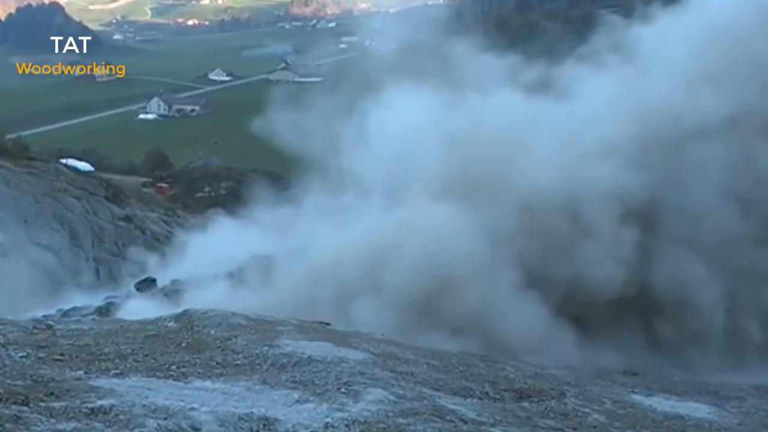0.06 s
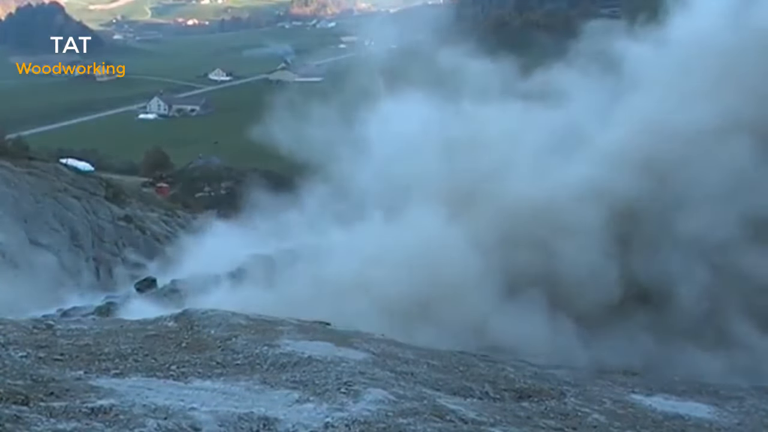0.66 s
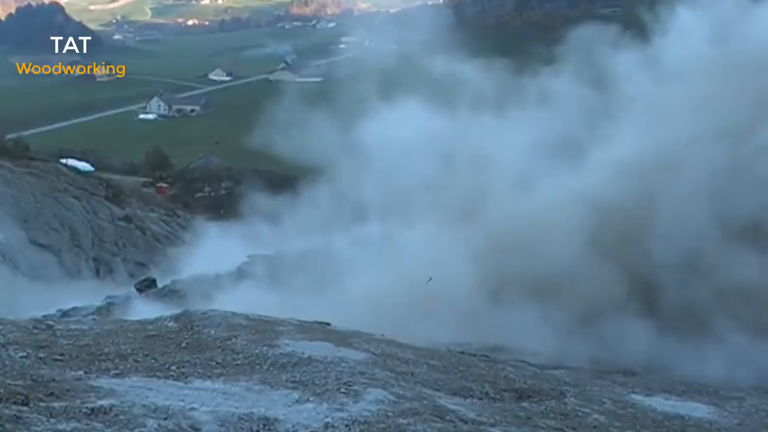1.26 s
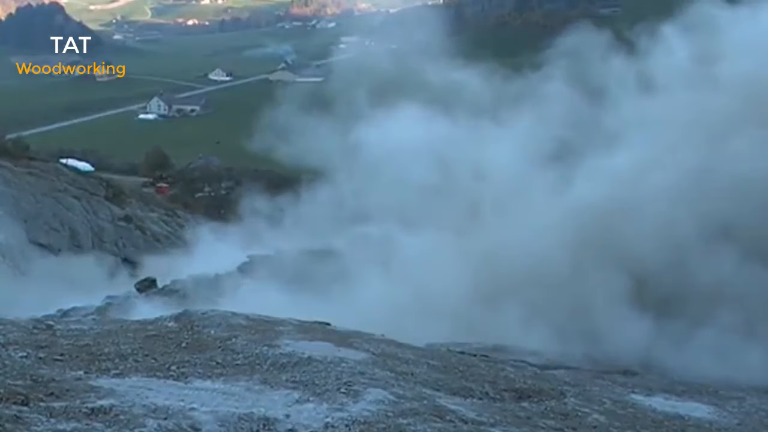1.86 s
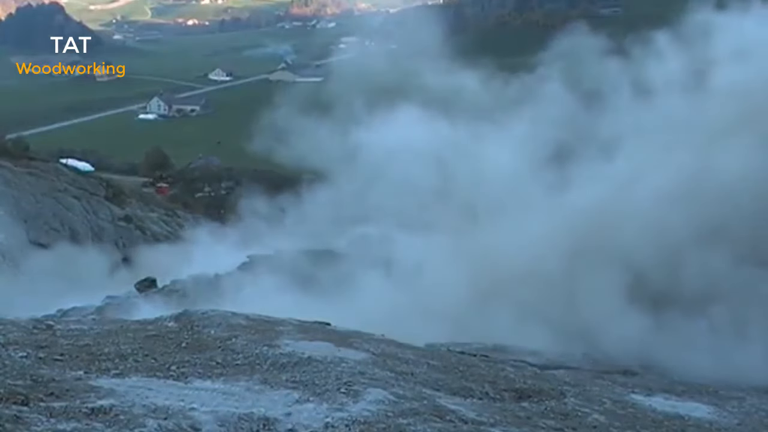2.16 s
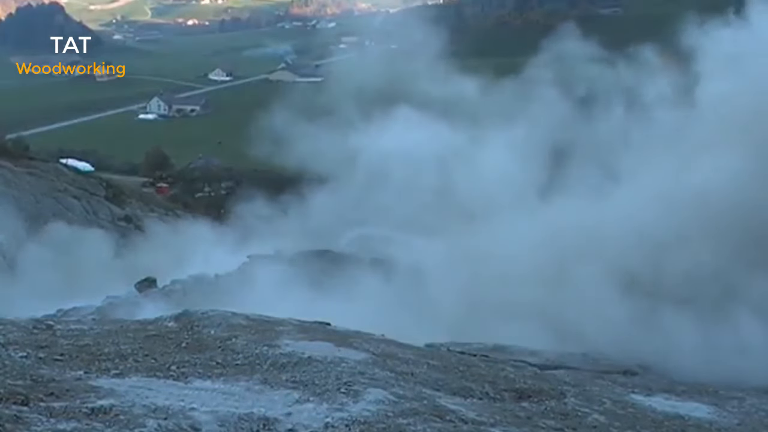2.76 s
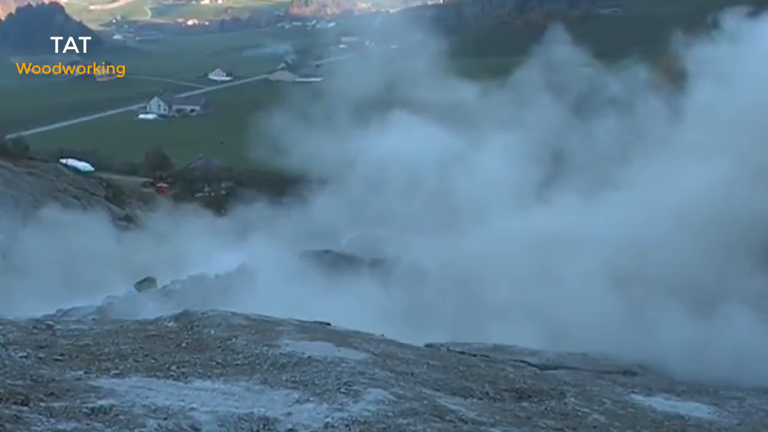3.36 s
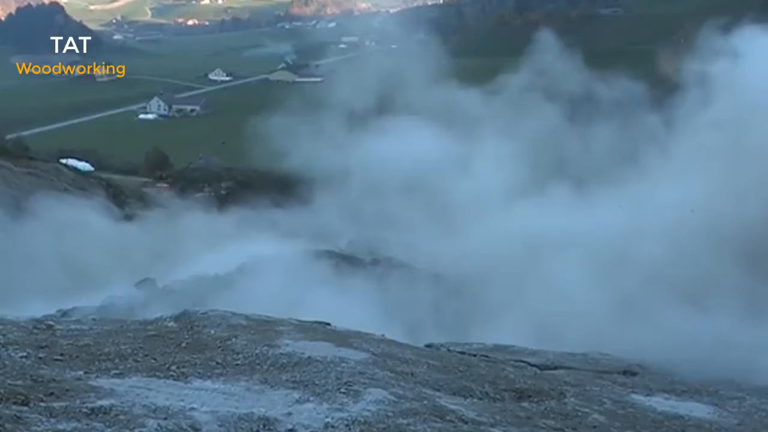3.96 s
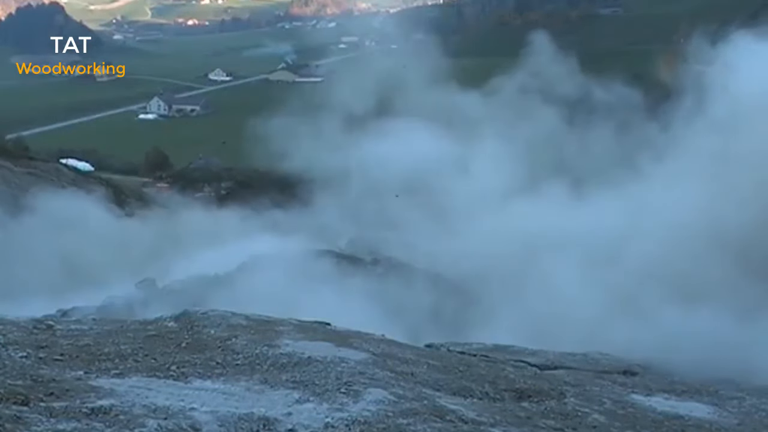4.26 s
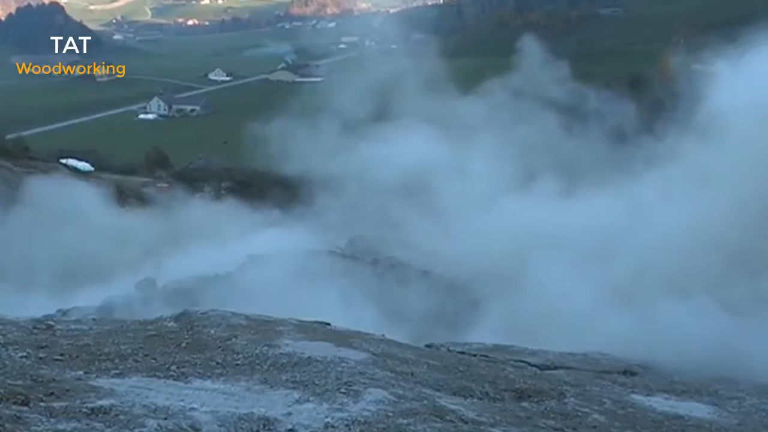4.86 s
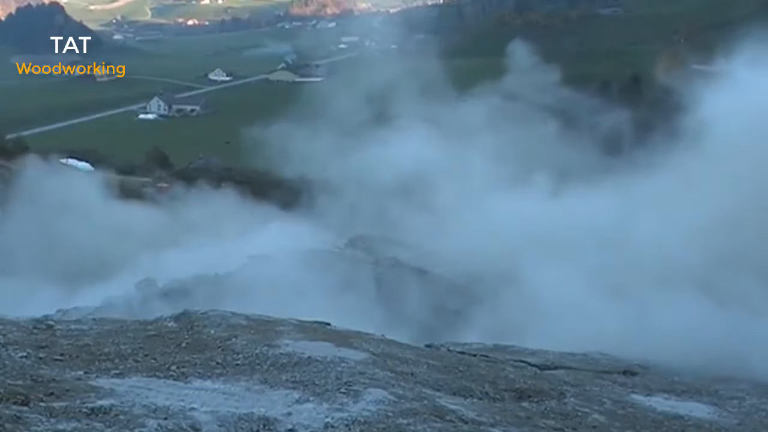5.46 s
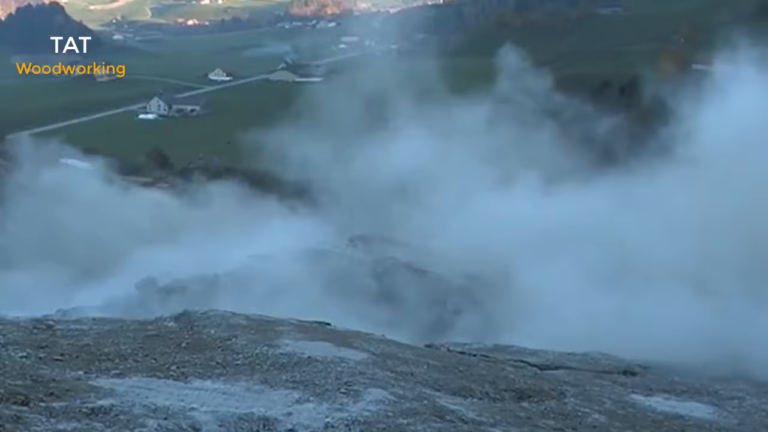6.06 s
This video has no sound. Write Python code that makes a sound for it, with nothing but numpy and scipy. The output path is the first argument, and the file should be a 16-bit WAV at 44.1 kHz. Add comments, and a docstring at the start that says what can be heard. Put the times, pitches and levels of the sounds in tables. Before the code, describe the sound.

Blasted rock pours down a quarry face, heard from the rim in open air. Countless small knocks merge into a broad, clattering rush, with a low ground rumble beneath it. Boulders land with dull thuds, most often in the first half, and now and then a brief spray of grit ticks closer by. The slide slowly weakens as the heap settles but is still running at the end.

```python
"""A broad, clattering rush of stones that slowly ebbs: blasted rock pours down a quarry face,
heard from the rim in open air. Countless knocks merge into the rush, fading as the heap settles.
Under it the sliding mass shakes the ground with a low rumble.
Now and then grit sprays closer by, and landing boulders thud."""
import sys
import numpy as np
from scipy import signal
from scipy.fft import rfft, irfft, next_fast_len
from scipy.io import wavfile
from scipy.ndimage import uniform_filter1d

SR = 44100
rng = np.random.default_rng(int(sys.argv[2]) if len(sys.argv) > 2 else 0)


def transcribe(signal):
    """Save signal, clipped to [-1, 1], as a 16-bit WAV file at the path in sys.argv[1]."""
    frames = np.atleast_2d(signal).T
    limited = np.clip(frames, -1, 1)
    pcm = np.round(limited * 32767).astype(np.int16)
    wavfile.write(sys.argv[1], SR, pcm)


N = 274291
HOP = 128
TIME_S = np.arange(N) / SR
FRAME_S = np.arange(N // HOP + 6) * HOP / SR
BIN_HZ = np.fft.rfftfreq(4 * HOP, 1 / SR)

# flow of the slide: (time [s], clatter level [dB], coarse rubble share [dB], fine grit share [dB])
FLOW = [(0.0, -26, -10.5, -8.5), (1.5, -26, -10.5, -8.5), (2.7, -27, -11, -8.5), (3.26, -28.5, -11.5, -7.5),
        (4.75, -30, -11.5, -8), (6.22, -31.6, -12.5, -6.5)]


def gain_of(db):
    return 10 ** (np.asarray(db) / 20)


def unit_rms(x):
    return x / np.sqrt(np.mean(x ** 2) + 1e-20)


def at_hz(rows, hz, column=1):
    """One table column, interpolated over log frequency."""
    table = np.transpose(rows)
    return np.interp(np.log(hz + 1), np.log(table[0] + 1), table[column])


def at_time(rows, time_s):
    """All value columns, interpolated over time."""
    knots_s, *columns = np.transpose(rows)
    return [np.interp(time_s, knots_s, column) for column in columns]


def bell(centre_s, sigma_s):
    """Gaussian envelope, height 1."""
    return np.exp(-.5 * ((TIME_S - centre_s) / sigma_s) ** 2)


def swells_db(rows):
    """Sum of bell-shaped level rises."""
    return sum(db * bell(centre_s, sigma_s) for centre_s, db, sigma_s in rows)


def coloured(x, spectrum):
    """x shaped by (frequency [Hz], level [dB]) rows, at rms 1."""
    size = next_fast_len(N)
    gain = gain_of(at_hz(spectrum, np.fft.rfftfreq(size, 1 / SR)))
    return unit_rms(irfft(rfft(x, size) * gain, size)[..., :N])


def spectra(x):
    """STFT as (channels, bins, frames)."""
    padded = np.pad(x, ((0, 0), (0, 8 * HOP)))
    return signal.stft(padded, nperseg=4 * HOP, noverlap=3 * HOP)[2][..., :len(FRAME_S)]


def stereo(fields):
    """Two independent STFTs to stereo at rms 1: alike in the bass, treble mostly leading on the left."""
    # two microphone ports: (frequency [Hz], coherence [0-1], left lead [rad], left over right [dB])
    ports = [(260, 1.0, -0.26, 0), (330, 0.99, -0.5, -0.8), (500, 0.87, 0.02, 0), (1400, 0.85, -0.07, 0.2),
             (2500, 0.69, 0.13, 0.2), (3300, 0.76, 0.36, 0.8), (4500, 0.67, 0.72, 1.7),
             (5500, 0.64, 0.88, 2.5), (6850, 0.6, 1.9, 2.5), (8200, 0.63, 1.04, 4),
             (9600, 0.62, 1.02, -0.5), (10800, 0.51, 2.5, 0.5), (12400, 0.4, 3, 0)]
    coherence, lead_rad, lean_db = (at_hz(ports, BIN_HZ, column)[:, None] for column in (1, 2, 3))
    right = (coherence * fields[0] + np.sqrt(1 - coherence ** 2) * fields[1]) * np.exp(-1j * lead_rad)
    pair = np.array([fields[0] * gain_of(lean_db / 2), right * gain_of(-lean_db / 2)])
    return unit_rms(signal.istft(pair, nperseg=4 * HOP, noverlap=3 * HOP)[1][:, :N])


def impacts(per_s, spread_db):
    """Two trains of random knocks, most small, a few large."""
    size = gain_of(spread_db * np.minimum(rng.exponential(1, (2, N)), 4))
    polarity = rng.choice([-1, 1], (2, N))
    hits = rng.random((2, N)) < per_s / SR
    return unit_rms(size * polarity * hits)


def patches(bins, frames):
    """Smoothed random time-frequency field, rms 1."""
    field = rng.standard_normal((len(BIN_HZ), len(FRAME_S)))
    return unit_rms(uniform_filter1d(uniform_filter1d(field, bins, axis=0), frames, axis=1))


def slide(level_db=2.0, near_db=-5, patchy_db=0.67, surge_db=0.27, rubble_hz=850, grit_hz=5200):
    """Far stones blur into a rush, nearer ones tick through it; rubble sounds low, grit high."""
    # rush of the stones: (frequency [Hz], level [dB])
    rush_spectrum = [(100, -20), (270, -9), (440, -4.2), (760, -4), (1250, -1.63), (2080, 0), (2450, -1.1),
                     (3150, 0.6), (4100, -.6), (5600, -6), (8100, -7), (9300, -12), (11000, -21.5),
                     (13500, -44.5)]
    # rings of tumbling blocks: (frequency [Hz], width [Hz], boost [dB])
    block_rings = [(640, 60, 1.5), (884, 60, 1.5), (1200, 55, 1), (1385, 45, 0.9), (1500, 70, 1.4),
                   (1675, 40, -1.5), (2850, 90, 1.0)]
    # stones thrown up by a heavy landing: (centre [s], swell [dB], sigma [s])
    bursts = [(.44, 2, 0.022)]
    far = rng.standard_normal((2, N))
    near = gain_of(near_db) * impacts(per_s=5000, spread_db=3.0)
    stones = unit_rms(far + near)
    flow_db, rubble_db, grit_db = at_time(FLOW, FRAME_S)
    hz = BIN_HZ[:, None]
    rings_db = sum(db / (1 + (2 * (hz - ring_hz) / width_hz) ** 2)
                   for ring_hz, width_hz, db in block_rings)
    bass_db = (rubble_db - rubble_db.mean()) / (1 + (hz / rubble_hz) ** 4)
    treble_db = (grit_db - grit_db.mean()) / (1 + (grit_hz / (hz + 1)) ** 6)
    # stones of like size fall in clumps
    clumps_db = patchy_db * patches(bins=9, frames=18) + surge_db * patches(bins=70, frames=14)
    colour_db = at_hz(rush_spectrum, hz) + rings_db + bass_db + treble_db + clumps_db
    rush = stereo(spectra(stones) * gain_of(colour_db))
    return rush * gain_of(level_db + np.interp(TIME_S, FRAME_S, flow_db) + swells_db(bursts))


def rumble(level_db=-42.0, ebb_ratio=1.1, deep_hz=50, deep_db=1.2, deep_ratio=1.6):
    """Moving mass shakes the ground: ebbs with the flow, swells at slumps, the deep band most. Mono."""
    # ground shake: (frequency [Hz], level [dB])
    ground_spectrum = [(8, -20), (19, -13), (30, -2.5), (48, -2.5), (62, 0.5), (76, -2), (110, -2.5),
                       (185, -4.5), (280, -11.5), (600, -37), (2000, -80)]
    # heavy parts of the heap giving way: (centre [s], swell [dB], sigma [s])
    slumps = [(.39, 4, .06), (.72, 1.5, .12), (1.5, 3.3, .25)]
    flow_db = at_time(FLOW, TIME_S)[0]
    mass_db = ebb_ratio * (flow_db - flow_db[0]) + swells_db(slumps)
    shake = coloured(rng.standard_normal(N), ground_spectrum)
    deep = signal.sosfiltfilt(signal.butter(2, deep_hz, fs=SR, output="sos"), shake, padtype="even")
    upper = gain_of(mass_db) * (shake - deep)
    return gain_of(level_db) * (upper + gain_of(deep_db + deep_ratio * mass_db) * deep)


def grit_sprays():
    """Brief showers of fine grit, close enough to keep their treble."""
    # showers: (centre [s], level [dB], sigma [s])
    showers = [(.33, -41, .008), (.417, -40, .005), (.871, -41, .006), (1.185, -42, .005),
               (1.416, -33, .004), (3.403, -34.5, .013), (4.853, -43, .005)]
    # grit ticks: (frequency [Hz], level [dB])
    grit_spectrum = [(300, -40), (2500, -8), (5500, -1), (9500, -1), (11500, -4), (14000, -17)]
    envelope = sum(gain_of(db) * bell(centre_s, sigma_s) for centre_s, db, sigma_s in showers)
    ticks = coloured(impacts(per_s=3500, spread_db=2.5), grit_spectrum)
    return envelope * stereo(spectra(ticks))


def boulders(level_db=-1, rise_s=.003, decay_cycles=1.6, crunch_gain=.3):
    """Each landing is a low push with a dull crunch; heavy, low boulders last longer."""
    # landings: (time [s], level [dB], pitch [Hz])
    landings = [(.366, -32, 42), (.406, -33, 58), (.431, -32, 170), (.446, -33, 130), (.645, -33, 45),
                (.73, -34, 65), (1.125, -34, 135), (1.532, -34, 62), (1.61, -33, 38), (1.792, -30.5, 58),
                (2.485, -33.5, 100), (2.73, -32, 160), (3.652, -39, 80), (4.018, -37, 65), (4.73, -39, 54),
                (5.538, -37.5, 150), (6.038, -36.5, 70)]
    crunch_spectrum = [(40, -20), (120, -1), (300, -6), (1200, -30), (5000, -70)]
    crunch = coloured(rng.standard_normal(N), crunch_spectrum)
    out = np.zeros(N)
    for start_s, db, pitch_hz in landings:
        start = round(start_s * SR)
        span = slice(start, start + SR // 4)
        age_s = TIME_S[span] - TIME_S[start]
        envelope = (1 - np.exp(-age_s / rise_s)) * np.exp(-age_s * pitch_hz / decay_cycles)
        thud = np.sin(2 * np.pi * pitch_hz * age_s) + crunch_gain * crunch[span]
        out[span] += gain_of(level_db + db) * envelope / envelope.max() * thud
    return out


def scene():
    """Stereo rush and grit over mono rumble and thuds."""
    return slide() + rumble() + grit_sprays() + boulders()


def record(dry):
    """Steep low-pass band limit."""
    cutoff_hz = 14400
    taps = signal.firwin(511, cutoff_hz, window=("kaiser", 9), fs=SR)
    return signal.oaconvolve(dry, taps[None], "same")


dry = scene()
out = record(dry)
transcribe(out)
```